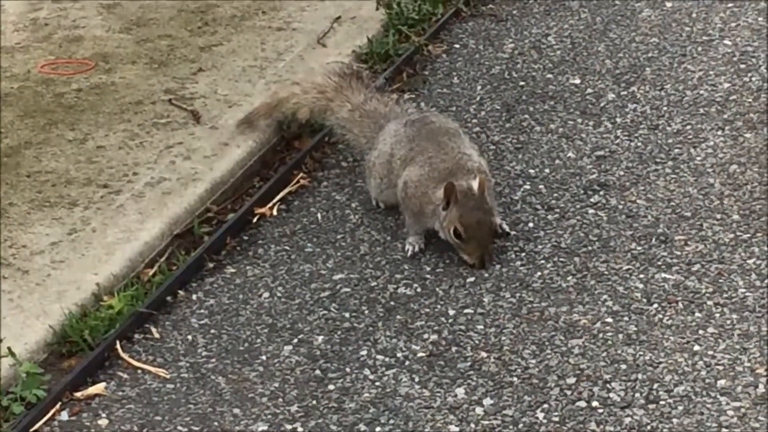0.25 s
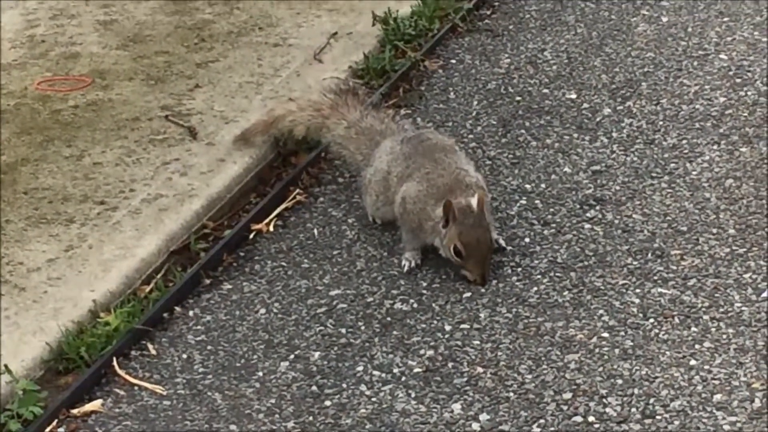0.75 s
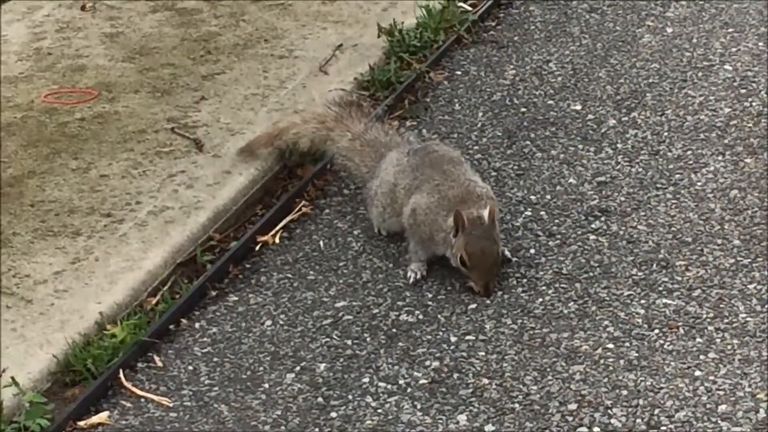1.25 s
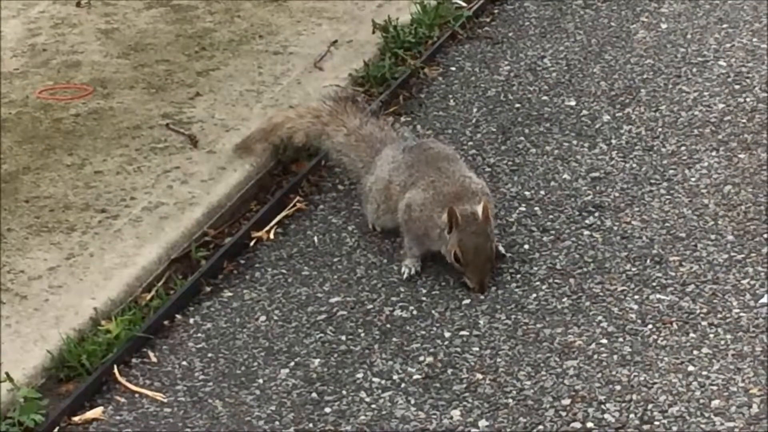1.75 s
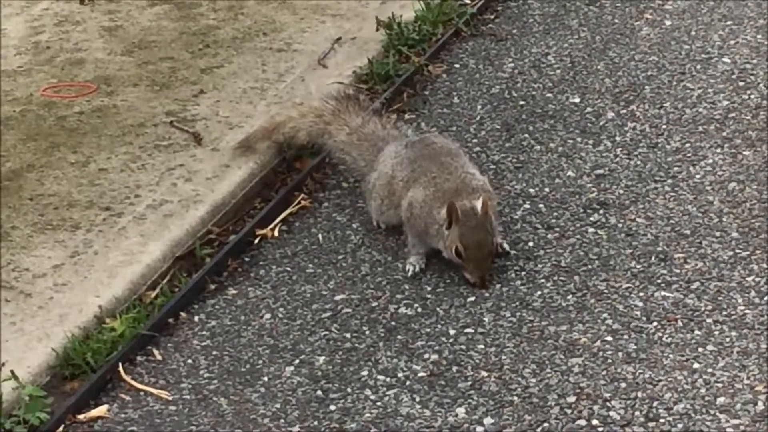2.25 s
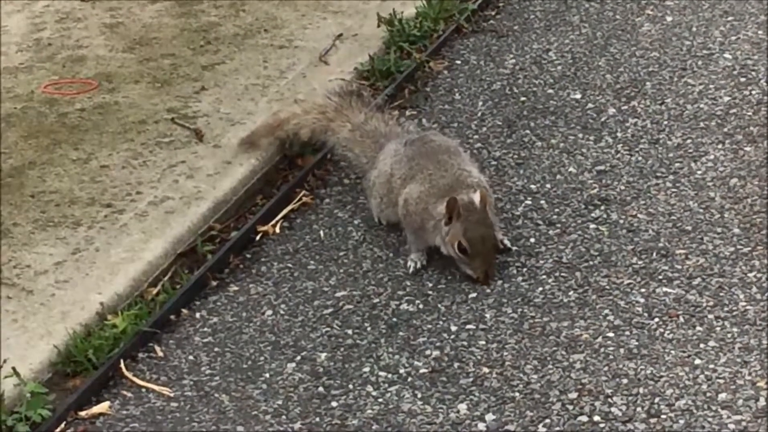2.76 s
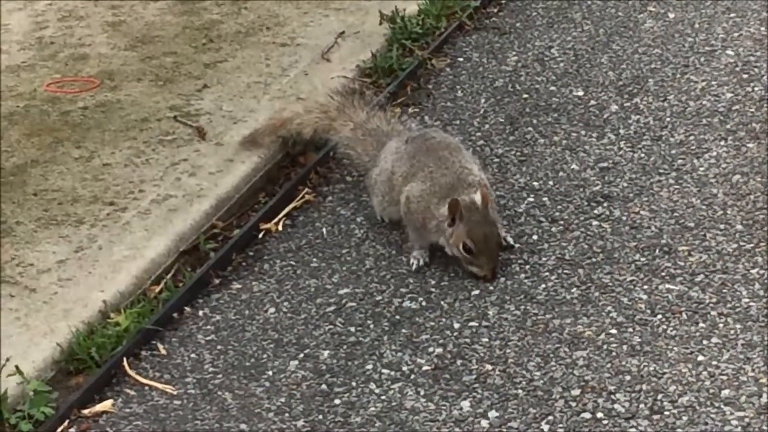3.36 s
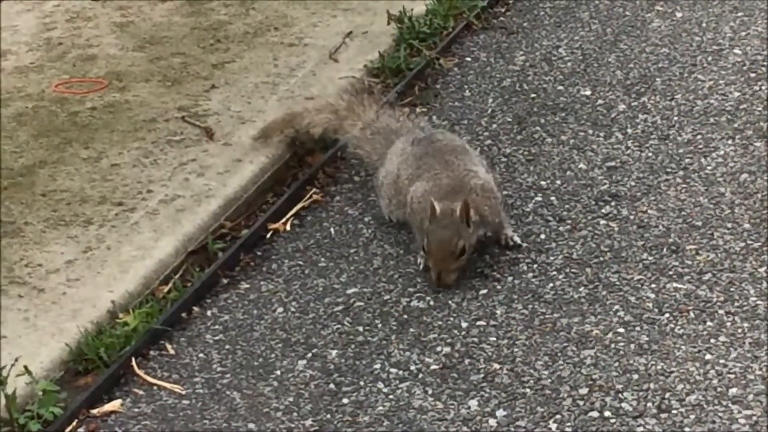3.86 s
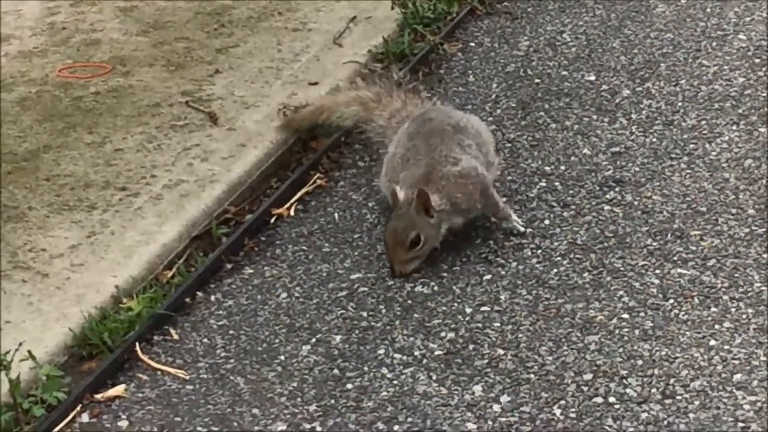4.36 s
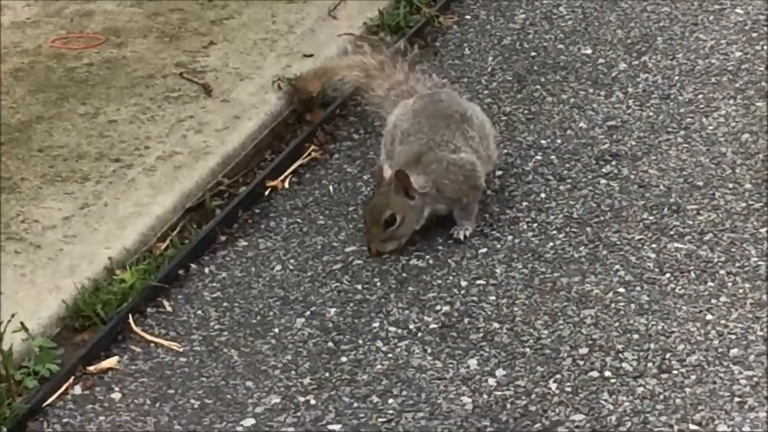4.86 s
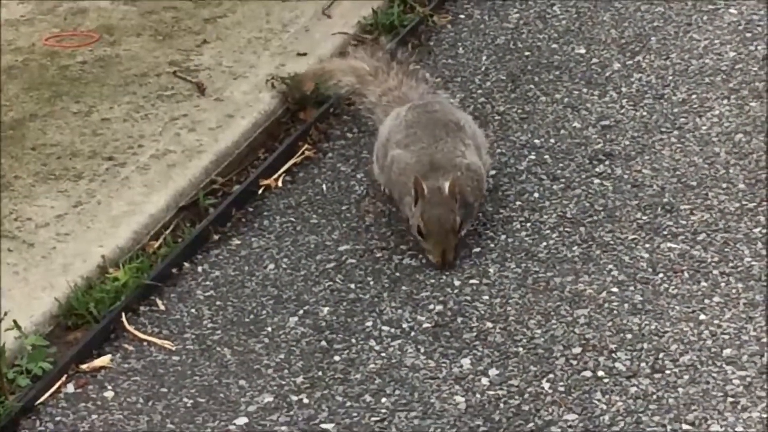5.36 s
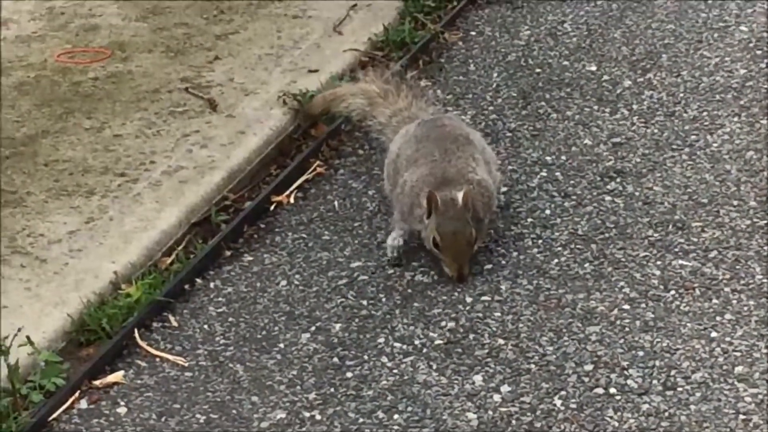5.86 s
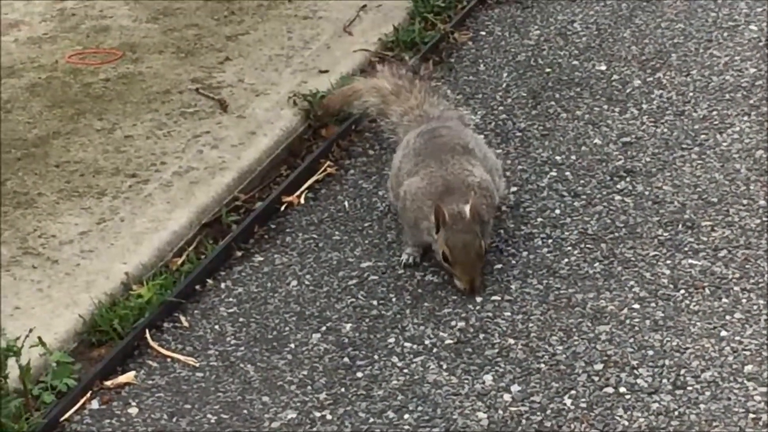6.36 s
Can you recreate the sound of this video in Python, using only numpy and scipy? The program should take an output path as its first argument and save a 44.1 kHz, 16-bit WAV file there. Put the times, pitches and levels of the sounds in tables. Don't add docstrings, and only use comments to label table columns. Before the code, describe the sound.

Far-off traffic hums continuously outdoors while a squirrel makes faint crisp clicks on gritty pavement and birds chirp, lisp and warble quietly.

```python
import sys
import numpy as np
from scipy import signal
from scipy.fft import rfft, irfft, next_fast_len
from scipy.io import wavfile
from scipy.ndimage import uniform_filter1d

SR = 44100
rng = np.random.default_rng(int(sys.argv[2]) if len(sys.argv) > 2 else 0)


def transcribe(signal):
    frames = np.atleast_2d(signal).T
    limited = np.clip(frames, -1, 1)
    pcm = np.round(limited * 32767).astype(np.int16)
    wavfile.write(sys.argv[1], SR, pcm)


def attenuation_scalar(level_db):
    decades = np.asarray(level_db, float) / 20
    return 10 ** decades


N = 291466


def in_time(rows):
    s, *columns = np.transpose(rows)
    return [np.interp(np.arange(N) / SR, s, c) for c in columns]


def rms_one(x):
    return x / np.sqrt(np.mean(x ** 2) + 1e-20)


def drift(size):
    smooth = uniform_filter1d(rng.standard_normal(N), size=size)
    return rms_one(uniform_filter1d(smooth, size=size))


def coloured(spectrum):
    size = next_fast_len(N)
    table_hz, db = np.transpose(spectrum)
    bin_hz = np.arange(1, size // 2 + 2) * SR / size
    gain = attenuation_scalar(np.interp(np.log(bin_hz), np.log(table_hz), db, left=-200, right=-200))
    return rms_one(irfft(rfft(rng.standard_normal(size)) * gain, size)[:N])


def resonance(x, hz, width_hz):
    r = np.exp(-np.pi * width_hz / SR)
    poles = [1, -2 * r * np.cos(2 * np.pi * hz / SR), r * r]
    return signal.lfilter([(1 - r * r) / 2, 0, (r * r - 1) / 2], poles, x)


def band(x, low_hz, high_hz):
    edges_hz = [low_hz, min(high_hz, 0.45 * SR)]
    return signal.sosfilt(signal.butter(3, edges_hz, "band", fs=SR, output="sos"), x)


def add(out, s, piece):
    at = int(s * SR)
    out[at:at + len(piece)] += piece[:N - at]


def engines():
    # (time [s], level [dB])
    heavy_swell = [(0.0, -34), (0.51, -35.5), (0.92, -37.5), (2.43, -38), (3.07, -35.5), (4.25, -35.5),
                   (4.41, -39.5), (6.29, -35), (6.6, -47)]
    # (frequency [Hz], density [dB per Hz])
    rumble_spectrum = [(24, -32), (40, -7), (70, 2.5), (135, -3.5), (211, -9.5), (328, -20), (365, -23),
                       (420, -26.5), (520, -33.5), (680, -44), (1140, -120)]
    light_level_db, light_follows_share = -37.5, -0.2
    heavy_db, = in_time(heavy_swell)
    rumble = coloured(rumble_spectrum)
    heavy = signal.sosfiltfilt(signal.butter(2, 110, fs=SR, output="sos"), rumble)
    light_db = light_level_db + light_follows_share * (heavy_db - heavy_db.mean())
    return attenuation_scalar(heavy_db - 1.5) * rms_one(heavy) + attenuation_scalar(light_db) * rms_one(rumble - heavy)


def tyre_roar():
    # (frequency [Hz], density [dB per Hz])
    roar_spectrum = [(260, -41), (440, -7), (534, -4.5), (644, -5), (698, -3), (757, -3.5), (942, 0.5),
                     (1070, -1.5), (1400, -2), (2020, -8), (2430, -15), (3050, -26.5), (3960, -46),
                     (6710, -120)]
    level_db, fade_db_per_s, patchy_db = -44.5, 0.13, 0.63
    track_db = level_db - fade_db_per_s * np.arange(N) / SR + patchy_db * drift(size=4000)
    return attenuation_scalar(track_db) * coloured(roar_spectrum)


def motor_drones():
    # (frequency [Hz], width [Hz], level [dB])
    motors = [
        (69.4, 15, -43.5),
        (140.2, 7, -48),
        (361.7, 4.5, -60.5),
    ]
    out = np.zeros(N)
    for hz, width_hz, db in motors:
        once = resonance(rng.standard_normal(N), hz, width_hz)
        out += attenuation_scalar(db) * rms_one(resonance(once, hz, width_hz))
    return out


def snaps():
    # (time [s], peak above 9 kHz [dB], part under 9 kHz re peak [dB])
    fractures = [(.1194, -64, -8), (.2219, -54, -12), (.3107, -61, -15), (.3606, -58, -18),
                 (.6529, -62, -11), (0.6846, -51, -11), (.6983, -46, -19), (0.9957, -37, -23),
                 (1.0394, -58, -10), (1.1932, -57, -16), (1.3798, -62, -12), (1.5988, -59, -9),
                 (1.7035, -50.5, -16), (1.7245, -55, -11), (1.7439, -54, -15), (1.9101, -62, -11),
                 (2.1435, -58, -3), (2.1644, -63, 0), (2.529, -60, -2), (2.576, -58, -12),
                 (2.7087, -51, -22), (2.722, -48, -28), (3.2231, -61, -6), (3.5778, -55, -18),
                 (3.6476, -62, -14), (4.368, -60, -11), (4.5885, -59, -17), (4.6927, -59, -12),
                 (5.0779, -63, -6), (6.108, -53, -5)]
    decay_s = 0.002
    out, t = np.zeros(N), np.arange(round(0.02 * SR)) / SR
    for s, db, low_db in fractures:
        burst = rng.standard_normal((2, len(t))) * np.exp(-t / decay_s)
        bright = band(burst[0], 9600, 14900)
        dull = band(burst[1], 3400, 8600)
        snap = attenuation_scalar(db - 0.5) * bright / np.max(abs(bright))
        snap += attenuation_scalar(db + low_db + 9.5) * dull / np.max(abs(dull))
        add(out, s - 0.0003, snap)
    return out


def crunches():
    # (time [s], length [s], lowest frequency [Hz], level [dB])
    broad_sprays = [(0.227, 0.028, 5500, -68), (0.693, 0.027, 5500, -66), (.765, .04, 11500, -81),
                    (0.981, .018, 5600, -66), (0.989, 0.037, 5200, -57), (1.0, 0.012, 5500, -51.5),
                    (1.132, .05, 8000, -76), (1.195, .025, 7000, -75), (1.625, .039, 6000, -74),
                    (1.69, .07, 5500, -73), (2.134, 0.057, 4000, -73), (2.524, .018, 5000, -65),
                    (2.57, 0.024, 4000, -64), (2.7, 0.038, 12000, -69), (2.98, .6, 4000, -79),
                    (3.432, .05, 10000, -79), (4.582, .03, 11500, -79), (4.687, .02, 6000, -73),
                    (5.076, 0.054, 4500, -73), (5.543, .02, 9000, -77), (5.58, .073, 4300, -76),
                    (6.097, 0.033, 5800, -63), (6.372, .03, 9000, -81)]
    # (time [s], centre frequency [Hz], level [dB])
    pebbles = [(1.735, 5400, -75), (2.572, 4400, -73), (2.593, 2920, -64), (2.74, 2900, -68),
               (3.59, 3000, -64), (5.075, 5350, -74), (5.54, 4620, -72), (5.544, 5750, -74),
               (5.545, 6750, -76), (5.075, 8000, -77), (5.583, 4600, -73), (6.101, 5540, -65)]
    # (frequency [Hz], width [Hz], level [dB])
    shell_modes = [
        (6500, 1200, 3),
        (8900, 800, 5),
        (11500, 1100, -7),
    ]
    top_hz, least_span = 13700, 1.5
    pebble_s, pebble_width = 0.024, 0.056
    grains_per_s = 7000.0
    out, size = np.zeros(N), int(0.6 * SR)
    wide = [(s, length_s, low_hz, max(top_hz, least_span * low_hz), db)
            for s, length_s, low_hz, db in broad_sprays]
    narrow = [(s, pebble_s, hz * (1 - pebble_width), hz * (1 + pebble_width), db)
              for s, hz, db in pebbles]
    for s, length_s, low_hz, high_hz, db in wide + narrow:
        clumps = attenuation_scalar(2.6 * rms_one(uniform_filter1d(rng.standard_normal(size), size=200)))
        grains = attenuation_scalar(3.3 * np.minimum(rng.exponential(1, size), 4))
        grains *= rng.choice([-1, 1], size)
        grains *= rng.random(size) < grains_per_s / SR
        u = np.clip(np.arange(size) / (length_s * SR), 0, 1)
        grains *= clumps * np.sin(np.pi * u ** 0.54) ** 0.46
        struck = rng.integers(0, len(shell_modes), size)
        ringing = np.zeros(size)
        for k, (hz, width_hz, ring_db) in enumerate(shell_modes):
            ringing += attenuation_scalar(ring_db - 1.5) * resonance(grains * (struck == k), hz, width_hz)
        spray = band(ringing + signal.lfilter([0.6], [1, -0.4], grains), low_hz, high_hz)
        add(out, s, attenuation_scalar(db) * spray / np.sqrt(np.sum(spray ** 2) / (length_s * SR)))
    return out


def grit(per_s, db):
    ticks = attenuation_scalar(4.0 * np.minimum(rng.exponential(1, N), 4)) * (rng.random(N) < per_s / SR)
    dealt = rng.integers(0, 10, N)
    out = np.zeros(N)
    for k, hz in enumerate(np.geomspace(2800, 14500, num=10)):
        out += resonance(ticks * (dealt == k) + 1e-18, hz, 0.12 * hz)
    return attenuation_scalar(db) * out


def whistle(hz, db, waver):
    tremble = rms_one(uniform_filter1d(rng.standard_normal(len(hz)), size=260))
    phase = 2 * np.pi * np.cumsum(hz * (1 + waver * tremble)) / SR
    return np.sqrt(2) * attenuation_scalar(db) * np.sin(phase)


def slurs(notes, waver):
    out = np.zeros(N)
    for s, length_s, from_hz, to_hz, db in notes:
        u = np.linspace(0, 1, int(length_s * SR))
        add(out, s, np.sin(np.pi * u) ** 0.74 * whistle(from_hz + (to_hz - from_hz) * u, db, waver))
    return out


def lisping_bird():
    # (time [s], length [s], from [Hz], to [Hz], level [dB])
    graces = [
        (1.53, .06, 8150, 8200, -77.5),
        (1.62, 0.069, 8700, 8550, -75),
        (2.44, 0.046, 8850, 8840, -75),
        (2.225, .07, 7050, 7320, -77),
        (2.64, .09, 8330, 8300, -80),
        (3.09, .08, 7080, 7150, -75),
        (3.3, .07, 8900, 8900, -70),
        (3.38, 0.12, 8300, 8300, -76),
        (4.02, .04, 8800, 8850, -81),
    ]
    # (time [s], length [s], from [Hz], to [Hz], level [dB])
    sees = [
        (1.647, 0.21, 8570, 8540, -73.5),
        (2.28, .23, 7400, 7540, -69),
        (2.46, 0.18, 8500, 8290, -67),
        (3.102, 0.25, 7430, 7540, -64),
        (3.331, .22, 8530, 8480, -66),
        (4.188, 0.28, 8750, 8780, -75),
        (5.087, 0.23, 8820, 8600, -74),
    ]
    peak_share, hold_share = 0.32, 0.67
    rise_db, sag_db, fall_db, flutter_depth_db = 9, 4, 18, 4.5
    out = slurs(graces, waver=0.0047)
    flutter_db = flutter_depth_db * drift(size=300)
    for s, length_s, from_hz, to_hz, db in sees:
        u = np.linspace(0, 1, int(length_s * SR))
        swell_db = np.interp(u, [0, peak_share, hold_share, 1], [-rise_db, 0, -sag_db, -fall_db])
        ends = np.clip(np.minimum(u, 1 - u) * length_s / 0.015, 0, 1)
        level_db = db + swell_db + flutter_db[int(s * SR):][:len(u)]
        add(out, s, ends * whistle(from_hz + (to_hz - from_hz) * u, level_db, waver=0.0091))
    return out


def thrush():
    # (time [s], length [s], from [Hz], to [Hz], level [dB])
    carol = [(4.2, 0.059, 3280, 3290, -59.5), (4.236, 0.025, 3130, 2880, -59),
             (4.25, .026, 2640, 2550, -53), (4.27, .067, 2546, 2410, -56), (4.9, 0.054, 2250, 2110, -50),
             (4.955, 0.05, 2160, 2170, -60), (5.015, 0.11, 2560, 2530, -55.5),
             (5.385, .03, 2960, 3140, -58), (5.41, .04, 2950, 3190, -53.5),
             (5.545, 0.023, 2300, 2150, -50.5), (5.49, 0.039, 2460, 2570, -52.5),
             (5.655, .037, 2350, 2410, -52.5), (5.718, 0.052, 2990, 3090, -54),
             (5.785, 0.021, 3070, 2930, -54), (5.805, 0.048, 2740, 2700, -53.5),
             (5.955, .033, 3420, 3300, -67), (6.2, 0.055, 2780, 2540, -49), (6.31, 0.067, 3020, 2900, -62)]
    # (time [s], pitch [Hz], level [dB])
    chips = [(.23, 3390, -71), (.37, 3335, -74), (1.35, 2800, -62), (1.66, 3330, -66), (1.675, 3100, -66),
             (2.1, 2925, -61), (2.66, 3985, -77), (2.7, 3730, -74), (3.4, 3075, -69), (5.372, 3340, -71),
             (5.525, 3365, -67), (5.61, 2900, -66), (5.83, 3040, -66), (5.87, 2730, -69), (5.99, 2510, -61),
             (6.145, 3050, -63), (6.4, 2910, -64)]
    # (time [s], centre [Hz], swing [Hz], rate [swings per s], level [dB])
    warbles = [
        (4.604, 2827, 135, 21., -49),
        (5.42, 3160, 70, 25, -61),
    ]
    chip_s, chip_drop_hz = 0.034, 40
    warble_s, rise_s, fade_db, flutter_db = 0.25, 0.039, 23, 4
    dip_share = 0.7
    falling = [(s, chip_s, hz + chip_drop_hz, hz - chip_drop_hz, db) for s, hz, db in chips]
    out = slurs(carol + falling, waver=0.0089)
    t, flutter = np.arange(int(warble_s * SR)) / SR, drift(size=500)
    for s, hz, swing_hz, per_s, db in warbles:
        turn = 2 * np.pi * per_s * t
        ends = np.clip(np.minimum(t / rise_s, (warble_s - t) / 0.01), 0, 1)
        shape = ends * (1 - dip_share * np.sin(turn) ** 2)
        level_db = db - fade_db * (t / warble_s) ** 2.6
        level_db = level_db + flutter_db * flutter[int(s * SR):][:len(t)]
        add(out, s, shape * whistle(hz + swing_hz * np.cos(turn), level_db, waver=0.011))
    return out


def trees(x, echo_db):
    t60_s, first_echo_s = 0.35, 0.004
    t = np.arange(round(0.5 * SR)) / SR
    cloud = rng.standard_normal(len(t)) * attenuation_scalar(-60 * t / t60_s) * (t > first_echo_s)
    return x + attenuation_scalar(echo_db) * signal.fftconvolve(x, cloud / np.linalg.norm(cloud))[:N]


def leaves_and_hiss():
    # (frequency [Hz], density [dB per Hz])
    air_spectrum = [(2600, -20), (3300, 4.5), (3900, 1.5), (4600, -2.5), (5000, -6), (5500, -3), (7000, -7),
                    (8500, -8), (9700, -8), (10500, -12), (11500, -10), (14000, -12), (15800, -15),
                    (17000, -31)]
    # (time [s], level [dB])
    breeze = [(0, 0), (1, 0.5), (2.5, 0), (3.1, 2), (4, 0), (6.6, -.5)]
    level_db = -72
    return attenuation_scalar(level_db + in_time(breeze)[0]) * coloured(air_spectrum)


def scene():
    traffic = engines() + tyre_roar() + motor_drones()
    squirrel = snaps() + crunches() + grit(per_s=40.0, db=-54.0)
    birds = trees(lisping_bird(), echo_db=-4.0) + trees(thrush(), echo_db=-6.0)
    return (traffic + squirrel + birds + leaves_and_hiss())[None]


def top_cut(x):
    return signal.sosfilt(signal.butter(12, 15830, fs=SR, output="sos"), x)


def record(dry):
    # (frequency [Hz], width [Hz], share removed)
    port_notch = (10260, 630, 0.33)
    hz, width_hz, share = port_notch
    heard = dry - share * resonance(dry, hz, width_hz)
    ceiling = 0.25
    return top_cut(ceiling * np.tanh(heard / ceiling))


dry = scene()
out = record(dry)
transcribe(out)
```